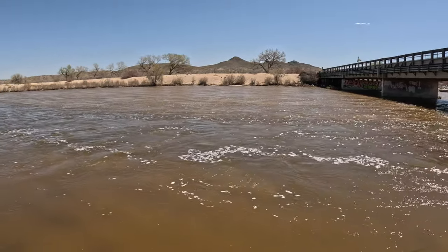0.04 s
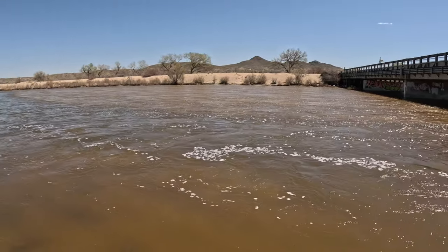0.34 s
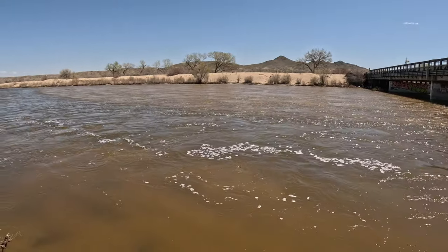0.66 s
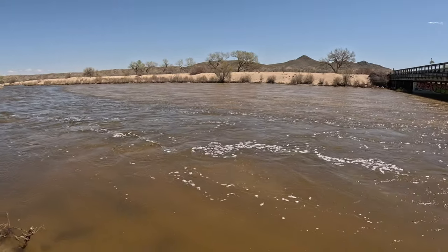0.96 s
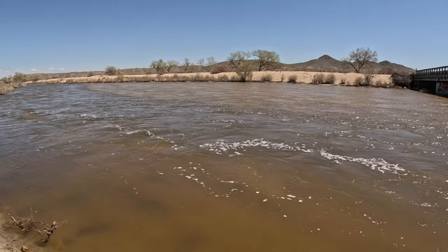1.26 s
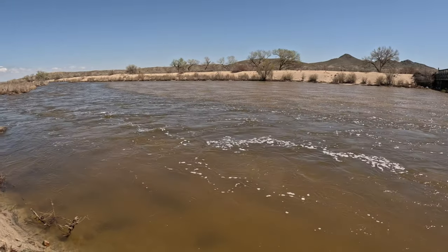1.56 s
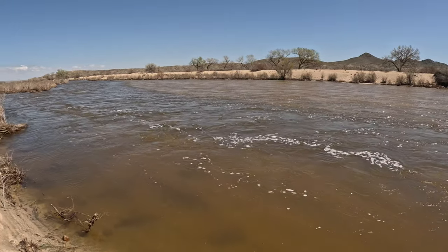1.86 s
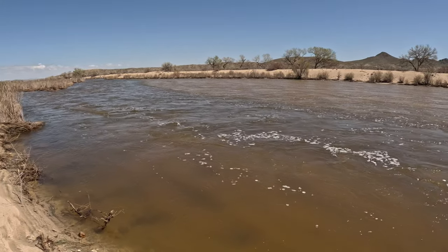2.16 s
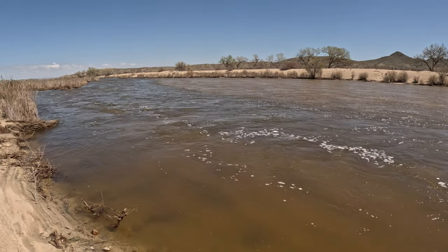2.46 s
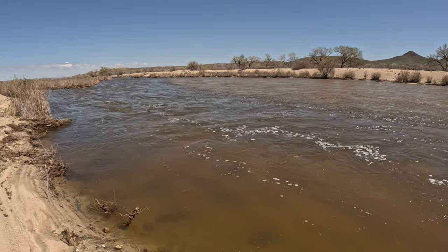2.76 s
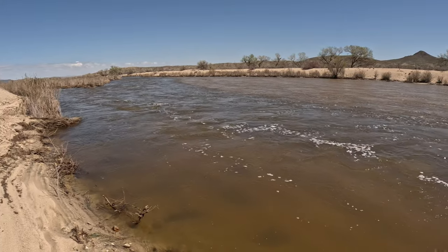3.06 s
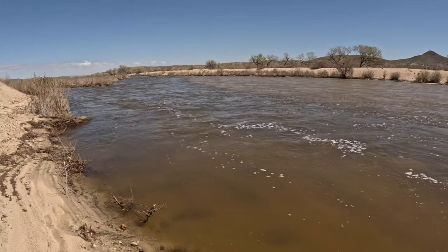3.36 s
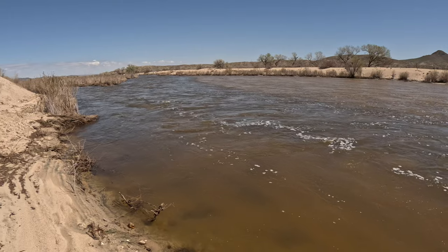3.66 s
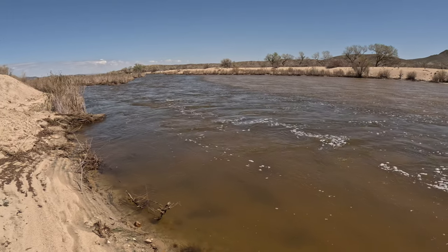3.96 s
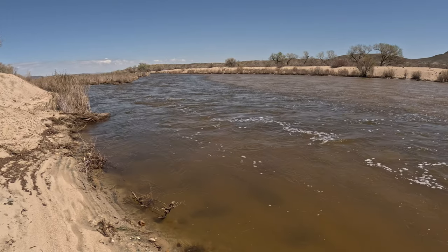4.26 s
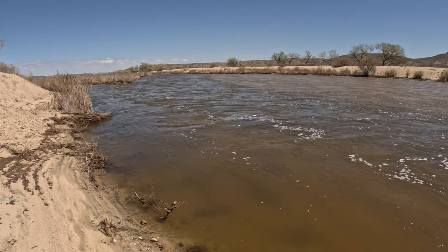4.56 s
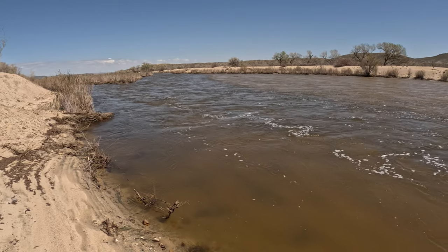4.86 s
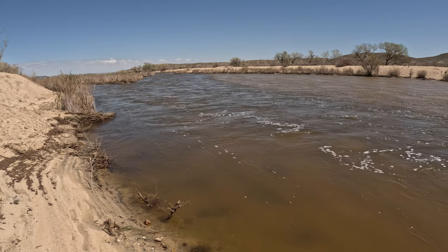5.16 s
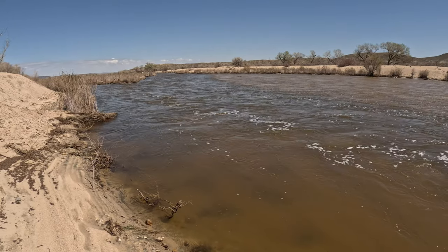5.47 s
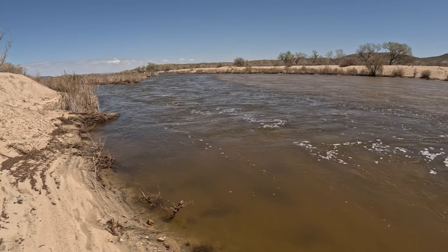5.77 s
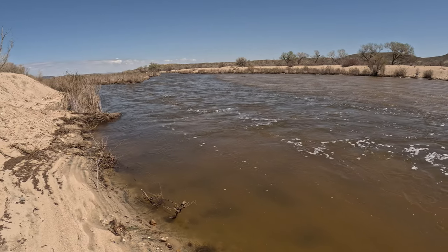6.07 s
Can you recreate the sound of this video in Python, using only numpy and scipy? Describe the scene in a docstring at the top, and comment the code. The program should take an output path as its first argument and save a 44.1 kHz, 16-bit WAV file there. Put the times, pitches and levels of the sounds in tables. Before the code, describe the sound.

A river churns and gurgles around bridge piers, heard from a sandy bank with wind rumbling low on the microphone. Two brief gusts rise at about 0.2 and 0.7 seconds. A faint low drone drops away near 0.8 seconds and creeps back softer. From 0.4 to 2.4 seconds the deep rush of the piers fades, leaving a quieter open current and a fine fizz of foam, swelling gently with small waves. Little bubbles plip and tick close by, more often after 1.5 seconds. Another gust comes at 2.6 seconds. Wavelets lightly slap the shore around 3.7, 4.7 and 5.9 seconds. From 5.2 seconds the wind strengthens and buffets the microphone with deep thumps, the loudest sounds, at about 5.4 and 5.8 seconds. A very faint hiss lies underneath throughout.

```python
"""The sandy bank of a fast, muddy river, near a bridge. Water churns and gurgles round the piers, a roar
that fades as the microphone turns away and leaves the open current and the fizz of its foam. Close by,
bubbles pop, each ringing at the pitch of its size, and wavelets slap the shore. Under it lie a low drone
and a faint hiss. Wind rumbles on the microphone throughout and buffets it hard near the end."""
import sys
import numpy as np
from scipy import signal
from scipy.fft import rfft, irfft, next_fast_len
from scipy.io import wavfile
from scipy.ndimage import uniform_filter1d

SR = 44100
rng = np.random.default_rng(int(sys.argv[2]) if len(sys.argv) > 2 else 0)


def int16_out(signal):
    """Quantize to a 16-bit WAV file."""
    q = np.round(np.clip(np.atleast_2d(signal).T, -1, 1) * 32767)
    wavfile.write(sys.argv[1], SR, q.astype(np.int16))


N = 269892

# Colour of the microphone's hiss, the wind's rumble, the foam, the open current and the roar at the piers.
# Each row: frequency in Hz, relative level in dB.
HISS_COLOUR = [(2000, 6.1), (9000, 2), (12000, 1.7), (15500, 1.5)]
RUMBLE_COLOUR = [(20, -5), (27, 9), (35, -11), (48, -2), (60, -23), (80, -23), (110, -29), (200, -31),
                 (400, -60)]
FOAM_COLOUR = [(1500, -0.5), (3200, 4.5), (4800, -1.5), (6300, -2.5), (8000, -7.5), (10000, -14.5),
               (15500, -13)]
CURRENT_COLOUR = [(70, -20), (140, 6.5), (205, -1), (290, 2.5), (450, 1), (800, 0.5), (1350, -3),
                  (2100, -9), (3400, -18.5), (5000, -23.5), (9000, -31)]
PIER_COLOUR = [(70, 6.5), (98, 6.5), (170, 3), (270, 4.5), (400, -3), (600, -1), (850, 2), (1450, -3),
               (2100, -10), (3200, -21.5), (5000, -37), (9000, -42.5)]
# The breeze on the microphone, freshening near the end. Each row: time in seconds, base level in dB.
BREEZE = [(0.0, -45.5), (1.2, -43), (1.55, -42), (1.85, -39.5), (2.3, -39), (2.5, -43.5), (4.8, -44.5),
          (5.1, -49), (5.25, -28.5), (5.5, -40), (5.75, -33.5), (5.92, -38.5)]
# Brief gusts on top of the breeze. Each row: centre in seconds, rise in dB.
BREEZE_GUSTS = [(0.24, 10), (0.68, 11.5), (1.04, 1), (1.17, 5), (2.60, 11.5), (3.0, 4)]
# Hard buffets on the microphone. Each row: centre in seconds, peak of the swing in dB, its frequency
# in Hz, its half length in seconds, flutter in dB relative to that peak.
WIND_BUFFETS = [(5.218, -29, 48.4, 0.0081, -12), (5.359, -14.5, 43, 0.017, -23),
                (5.761, -11.5, 41.3, 0.016, -21), (5.808, -14, 42, 0.026, -28)]
# Small waves running in along the bank. Each row: centre in seconds, half length in seconds,
# rise of the current in dB, rise of the foam in dB.
BANK_WAVES = [(1.58, 0.27, 4, 2.8), (2.553, 0.39, 2.5, 2), (3.664, 0.17, 1, 3), (4.252, 0.16, -0.5, 3.5),
              (4.632, 0.14, 2.0, 4), (5.34, 0.055, 2.5, 2.5), (5.933, 0.3, 2.5, 5.5)]
# Wavelets slapping the shore. Each row: start in seconds, level in dB, pitch in Hz, decay in seconds.
SHORE_SLAPS = [(3.658, -48, 377, 0.11), (3.765, -46, 690, 0.041), (3.784, -37.5, 1070, 0.009),
               (3.786, -45, 2350, 0.0037), (4.657, -46, 302, 0.062), (4.798, -48, 1010, 0.037),
               (5.32, -56.5, 5170, 0.031), (5.808, -49, 337, 0.02), (5.921, -41.5, 736, 0.02)]
# The clearest bubbles, close to the bank. Each row: time in seconds, peak in dB, pitch in Hz.
NEAR_BUBBLES = [(.302, -45, 6620), (.484, -45, 6850), (1.441, -45, 7700), (1.713, -47, 4330),
                (1.889, -38.5, 1010), (1.949, -44.5, 2800), (2.423, -44, 2650), (2.213, -42, 3090),
                (2.339, -42, 5990), (2.496, -38, 1090), (2.981, -37, 1680), (3.591, -42.5, 6460),
                (3.752, -41, 3070), (3.805, -38, 1066), (3.92, -41.5, 1420), (4.216, -43, 3730),
                (4.406, -38.5, 1145), (4.486, -38.5, 6100), (4.587, -39.5, 1360), (4.588, -43, 5980),
                (4.741, -42.5, 1660), (4.887, -43.5, 5710), (4.928, -41, 1140), (5.094, -39.5, 2770),
                (5.367, -37.5, 2240), (5.399, -44, 6440)]

TIME_S = np.arange(N) / SR


def from_db(db):
    """Decibels to gain."""
    return 10 ** (np.asarray(db) / 20)


def rms_one(x):
    """Scale to rms 1."""
    return x / np.sqrt(np.mean(x ** 2) + 1e-20)


def hump(centre_s, half_s):
    """A smooth rise and fall of height 1 round a moment."""
    return np.exp(-((TIME_S - centre_s) / half_s) ** 2)


def ramp(start_s, length_s):
    """A straight rise from 0 to 1."""
    return np.clip((TIME_S - start_s) / length_s, 0, 1)


def drift(rate_hz):
    """A slow random wander of rms 1."""
    step, run_in = 40, 2000
    pole = np.exp(-2 * np.pi * rate_hz * step / SR)
    noise = rng.standard_normal(N // step + run_in + 2)
    slow = signal.lfilter([1], [1, -2 * pole, pole * pole], noise)[run_in:]
    return np.interp(np.arange(N) / step, np.arange(len(slow)), rms_one(slow))


def band_noise(low_hz, high_hz):
    """Noise in one band, run in for a second; rms 1."""
    sos = signal.butter(2, [low_hz, high_hz], "band", fs=SR, output="sos")
    return rms_one(signal.sosfilt(sos, rng.standard_normal(N + SR))[SR:])


def coloured(x, colour):
    """Give a sound a spectrum that falls away steeply past its ends; rms 1."""
    size = next_fast_len(N)
    hz = np.maximum(np.fft.rfftfreq(size, 1 / SR), 1)
    points_hz, points_db = np.transpose(colour)
    gain = from_db(np.interp(np.log(hz), np.log(points_hz), points_db))
    skirts = 1 / (1 + (points_hz[0] / 1.4 / hz) ** 6) / (1 + (hz / 1.4 / points_hz[-1]) ** 6)
    return rms_one(irfft(rfft(x, size) * gain * skirts, size)[:N])


def evened(x, span_s):
    """Hold a noise at a steady strength over the given span."""
    return x / np.sqrt(uniform_filter1d(x * x, int(span_s * SR)) + 1e-6)


def ring(clicks, hz, cycles):
    """A unit click sets a sine of height 1 ringing; it dies by 60 dB in so many cycles."""
    pole, angle = from_db(-60 * hz / (cycles * SR)), 2 * np.pi * hz / SR
    return signal.lfilter([0, np.sin(angle)], [1, -2 * pole * np.cos(angle), pole * pole], clicks + 1e-18)


def microphone_hiss():
    """The microphone's own even hiss, behind everything."""
    return from_db(-65.5) * coloured(rng.standard_normal(N), HISS_COLOUR)


def drone():
    """A low drone wavers in the air; it drops away early, then creeps back softer and a little higher."""
    first = from_db(-46.5) * (1 - ramp(0.675, 0.125)) * evened(band_noise(95, 132), span_s=0.12)
    second = from_db(-54) * ramp(0.85, 1.97) * evened(band_noise(111.4, 150.2), span_s=0.18)
    return from_db(1.5 * drift(6.4)) * (first + second)


def wind():
    """Eddies press on the microphone: a slow swell and a lumpy rumble, both following the breeze."""
    breeze_db = np.interp(TIME_S, *np.transpose(BREEZE))
    gusts_db = sum(rise_db * hump(centre_s, half_s=0.069) for centre_s, rise_db in BREEZE_GUSTS)
    swell_db = -28.5 + 0.87 * (breeze_db - breeze_db.mean())
    swell = from_db(swell_db) * evened(band_noise(2.9, 7.3), span_s=0.297)
    eddies = evened(coloured(rng.standard_normal(N), RUMBLE_COLOUR), span_s=0.2)
    return swell + from_db(breeze_db + gusts_db - 1.5 * drift(11)) * eddies


def buffets(flutter_hz, flutter_half_s):
    """A strong eddy swings the pressure at the microphone to and fro, with a flutter at its crest."""
    out = np.zeros(N)
    flutter = evened(band_noise(flutter_hz / np.sqrt(2), flutter_hz * np.sqrt(2)), span_s=0.029)
    for centre_s, peak_db, hz, half_s, flutter_db in WIND_BUFFETS:
        swing = hump(centre_s, half_s) * np.cos(2 * np.pi * hz * (TIME_S - centre_s))
        crest = from_db(flutter_db) * hump(centre_s, flutter_half_s) * flutter
        out += from_db(peak_db) * (swing + crest)
    return out


def turned_away_db():
    """The piers fade by 22 dB over two seconds as the microphone turns from the bridge."""
    return -22 * ramp(start_s=0.41, length_s=2)


def churn(flicker_db, flicker_hz, surge_db):
    """Countless far splashes: flat noise whose half-octave bands each flicker and all surge together."""
    edges_hz = 60 * 2 ** (np.arange(17) / 2)
    bands = sum(np.sqrt(high - low) * band_noise(low, high) * from_db(flicker_db * drift(flicker_hz))
                for low, high in zip(edges_hz, edges_hz[1:]))
    return rms_one(bands * from_db(surge_db * drift(3.6)))


def bubbles(per_s, low_hz, high_hz, cycles, spread_db):
    """Bubbles are born in clusters; most are faint, a few loud, and each rings at its size's pitch."""
    pitches_hz = np.geomspace(low_hz, high_hz, 28)
    born = rng.random(N) < per_s * from_db(4 * drift(8)) / SR
    strengths = from_db(spread_db * np.minimum(rng.exponential(1, N), 4.5))
    clicks = born * strengths * rng.choice([-1, 1], N)
    pitch_index = rng.integers(0, len(pitches_hz), N)
    return rms_one(sum(hz * ring(clicks * (pitch_index == k), hz, cycles)
                       for k, hz in enumerate(pitches_hz)))


def foam():
    """Out on the foam lines small bubbles burst over a fine spray, louder at the piers and on each wave."""
    pops = bubbles(per_s=600, low_hz=2470, high_hz=11900, cycles=20, spread_db=4)
    spray = churn(flicker_db=2.5, flicker_hz=84, surge_db=1.46)
    waves_db = sum(rise_db * hump(centre_s, half_s) for centre_s, half_s, _, rise_db in BANK_WAVES)
    in_current, at_piers = from_db(-63 + waves_db), from_db(-59.5 + turned_away_db())
    return np.hypot(in_current, at_piers) * coloured(spray + from_db(-3.5) * pops, FOAM_COLOUR)


def slaps(attack_s):
    """On the shore each wavelet breaks in a short splash an octave wide."""
    out = np.zeros(N)
    for start_s, level_db, hz, decay_s in SHORE_SLAPS:
        age = np.maximum(TIME_S - start_s, 0)
        spray = evened(band_noise(hz / np.sqrt(2), hz * np.sqrt(2)), span_s=0.0077)
        out += from_db(level_db) * (1 - np.exp(-age / attack_s)) * np.exp(-age / decay_s) * spray
    return out


def stray_bubbles(per_s, peak_db, low_hz, high_hz):
    """Faint bubbles of random moment and pitch, in rows like those of NEAR_BUBBLES."""
    draws = rng.random((int(per_s * N / SR), 2))
    return [(when * N / SR, peak_db, low_hz * (high_hz / low_hz) ** pitch) for when, pitch in draws]


def plips():
    """Close up, a bubble rings briefly; droplets round the burst stir the same pitch; small ones snap."""
    out = np.zeros(N + 2 * SR)  # a spare second at each end
    age = np.arange(-SR // 50, SR // 20) / SR
    strays = stray_bubbles(per_s=3, peak_db=-46.5, low_hz=1960, high_hz=6950)
    for time_s, peak_db, hz in NEAR_BUBBLES + strays:
        size = 2000 / hz  # big bubbles ring low and stir the water for longer
        splash = np.exp(np.minimum(age / 0.0019, -age / 0.0032) / np.sqrt(size))
        droplets = from_db(-11) * np.sqrt(hz / SR) * rng.standard_normal(len(age)) * splash
        kick = (age == 0) + droplets
        snap = from_db(-17) / size * ring(kick, hz, cycles=2.2)
        burst = ring(kick, hz, cycles=39) + snap
        start = SR + int((time_s + age[0]) * SR)
        out[start:start + len(age)] += from_db(peak_db) * burst / np.max(np.abs(burst))
    return out[SR:SR + N]


def pier_roar(water):
    """Water roars deep round the piers; its bass bends round the turning microphone and fades less."""
    roar = from_db(-39) * coloured(water, PIER_COLOUR)
    bass = signal.sosfiltfilt(signal.butter(2, 360, fs=SR, output="sos"), roar)
    fade_db = turned_away_db()
    return from_db(0.86 * fade_db) * bass + from_db(fade_db) * (roar - bass)


def river():
    """Water churns and gurgles at the piers and in the lighter open current, which swells with the waves."""
    gurgles = bubbles(per_s=1300, low_hz=240.9, high_hz=4490, cycles=41.4, spread_db=2.5)
    water = churn(flicker_db=1.47, flicker_hz=23, surge_db=0.4) + from_db(-8.5) * gurgles
    waves_db = sum(rise_db * hump(centre_s, half_s) for centre_s, half_s, rise_db, _ in BANK_WAVES)
    current = from_db(-53 + waves_db) * coloured(water, CURRENT_COLOUR)
    return pier_roar(water) + current


def scene():
    """Water and wind at one microphone on the bank, over its own hiss."""
    water = river() + foam() + plips() + slaps(attack_s=0.00031)
    air = wind() + drone() + buffets(flutter_hz=154, flutter_half_s=0.0062)
    return (water + air + microphone_hiss())[None]


def record(dry):
    """The top is cut steeply above 15.7 kHz."""
    return signal.sosfilt(signal.ellip(12, 0.1, 90, 15700, fs=SR, output="sos"), dry)


dry = scene()
out = record(dry)
int16_out(out)
```